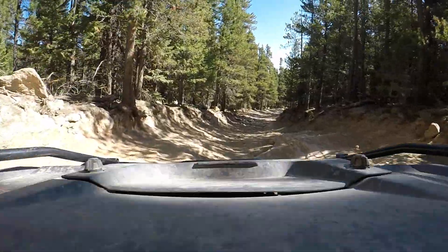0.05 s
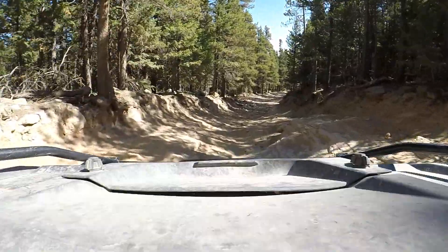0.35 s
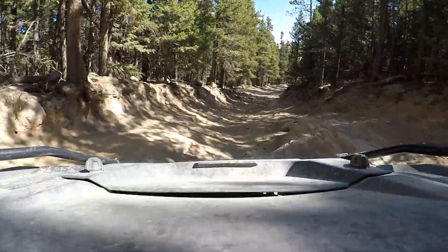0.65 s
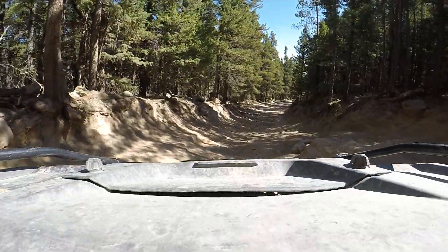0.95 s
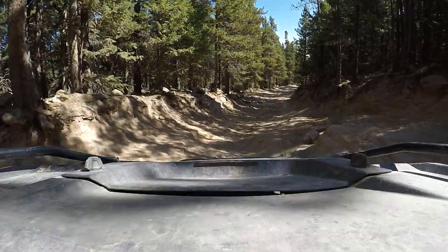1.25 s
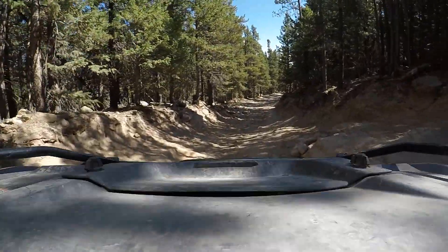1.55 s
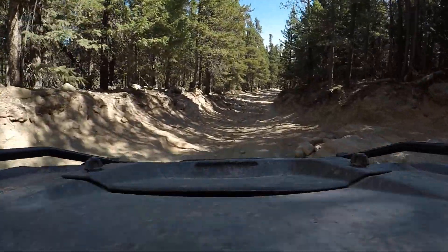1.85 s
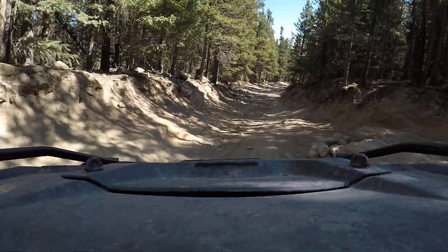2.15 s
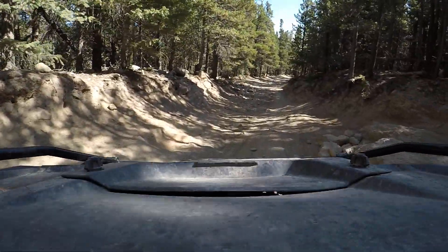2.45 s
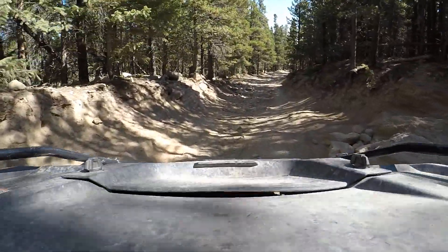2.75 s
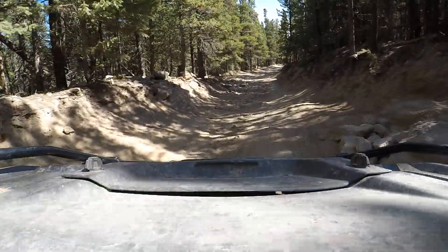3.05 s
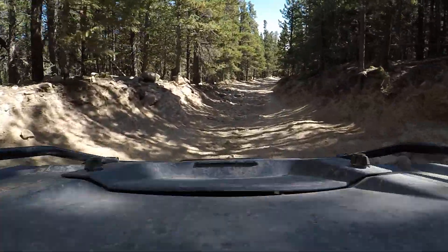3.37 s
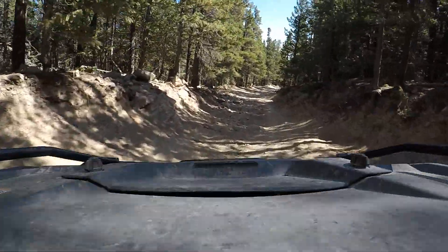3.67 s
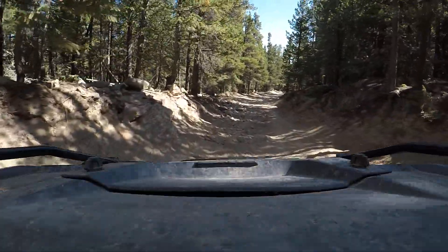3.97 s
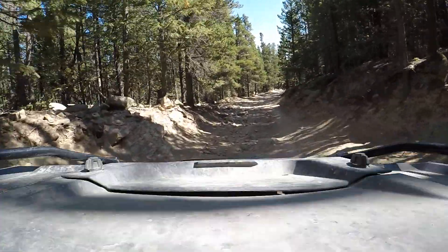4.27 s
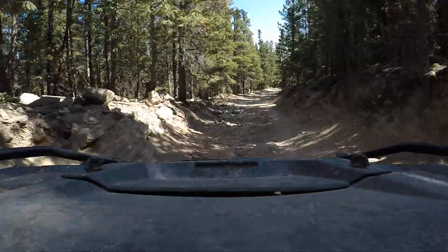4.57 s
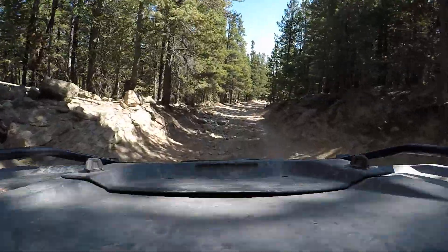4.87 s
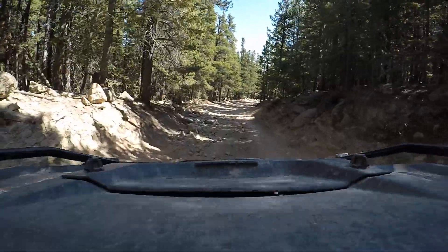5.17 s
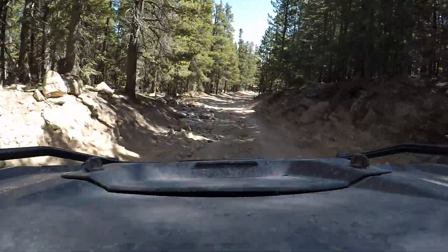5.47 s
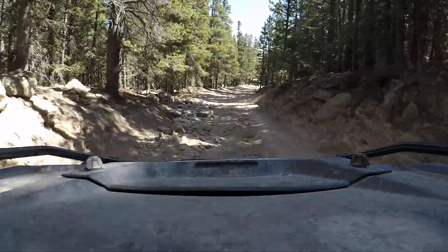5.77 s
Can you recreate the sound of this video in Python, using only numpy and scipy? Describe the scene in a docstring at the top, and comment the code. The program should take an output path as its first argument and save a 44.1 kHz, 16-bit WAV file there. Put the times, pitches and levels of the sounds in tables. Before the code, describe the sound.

A deep, throbbing engine eases off, chugs unevenly at low revs, then climbs again as an off-road vehicle works along a stony dirt track. Irregular jolts shake loose plastic and metal parts and send dull knocks through the underside. Short squeaks, faint creaks and a faint gear whine sit over the crunch of tyres. The microphone rides on the vehicle, close and dry.

```python
"""A booming twin-cylinder engine sinks almost to idle and pulls again as an off-road buggy crawls up a
rutted dirt trail, heard from its bonnet. Firings drive the exhaust and cab resonances; gas roars in the
engine bay. The chassis rumbles and creaks, tyres grind grit and gears whine. Jolts rattle loose fittings,
stones knock, metal clinks and dusty joints squeak. A limiter holds the boom down."""
import sys
import numpy as np
from scipy import signal
from scipy.fft import rfft, irfft, next_fast_len
from scipy.io import wavfile
from scipy.ndimage import uniform_filter1d, minimum_filter1d, map_coordinates

SR = 44100
rng = np.random.default_rng(int(sys.argv[2]) if len(sys.argv) > 2 else 0)


def generate_wav(signal):
    """Clip the signal to [-1, 1] and save it as 16-bit WAV at the path in sys.argv[1]."""
    frames = np.transpose(np.atleast_2d(signal))
    scaled = np.clip(frames, -1, 1) * 32767
    pcm = np.round(scaled).astype(np.int16)
    wavfile.write(sys.argv[1], SR, pcm)


N = 256662
TIME = np.arange(N) / SR

# Engine bay resonances. Each row: frequency in Hz, width in Hz, gain in dB.
BAY_MODES = [(221, 120, -6), (305, 84, 8), (402, 20, -18)]
# Resonances of loose fittings. Each row: frequency in Hz, width in Hz, gain in dB.
FITTING_MODES = [(553, 74, 3), (1210, 18, -8), (2303, 23, 1), (2993, 9.3, 3), (3140, 100, -5),
                 (3420, 17, -3), (3920, 70, -0.5), (4210, 110, -0.5), (4650, 510, -0.5), (4980, 61, -2),
                 (5730, 170, 1), (6160, 65, -2), (6530, 43, -8), (6760, 81, -7.5), (7000, 80, -19.5),
                 (8230, 63, -6.5), (9250, 100, -16)]
# Ground roughness. Each row: time in seconds, tyre grind in dB, grit and jiggle in dB.
ROUGHNESS = [(0, -31, -47.5), (.15, -37, -45.5), (.35, -37, -52.5), (.6, -36.5, -47), (.75, -33.5, -47.5),
             (1.0, -34.5, -46), (1.3, -41.5, -51), (1.5, -36, -45.5), (1.7, -36.5, -49.5),
             (1.95, -33.5, -44.5), (2.3, -36.5, -50), (2.72, -34.5, -50), (3.0, -29.5, -46),
             (3.25, -31, -44), (3.75, -32.5, -44), (4.15, -31, -45.5), (4.45, -35, -46.5), (4.8, -31, -46),
             (5.1, -34, -48), (5.82, -32.5, -44.5)]
# Rattling jolts. Each row: start in seconds, level in dB, middle against treble in dB, decay in seconds.
RATTLE_HITS = [(0.0014, -29, -13, 0.01), (0.096, -28.5, 3, 0.014), (0.177, -39, 9, 0.024),
               (0.226, -28, 9, 0.026), (0.3461, -39.5, 9.5, 0.0078), (0.7, -37, 3, 0.02),
               (0.7846, -37, 5, 0.004), (0.8978, -36, -5, 0.036), (0.947, -35.5, 1, 0.022),
               (1.006, -36.5, 8.5, 0.012), (1.062, -26.5, -19, 0.0075), (1.1448, -42.5, 11, 0.012),
               (1.1922, -42.5, 12, 0.0097), (1.4425, -31.5, -14, 0.024), (1.539, -32.5, -15, 0.014),
               (1.942, -23.5, -8, 0.03), (2.1833, -39, 3.5, 0.075), (2.3432, -24.5, 0.5, 0.027),
               (2.4812, -36.5, 5.5, 0.02), (3.046, -22, -20, 0.03), (3.212, -34, 5, 0.023),
               (3.248, -33, 4, 0.01), (3.278, -33, -5, 0.014), (3.4113, -33, -6.5, 0.082),
               (4.0039, -35.5, -2, 0.016), (4.4521, -26, -7, 0.0096), (4.645, -36, 1, 0.015),
               (4.9478, -35.5, 3, 0.018), (5.678, -33.5, -3, 0.028), (5.7523, -34.5, -12, 0.016)]
# Blows from stones and bump stops. Each row: start in seconds, level in dB, pitch in Hz.
KNOCK_HITS = [(0.034, -29, 2310), (0.109, -20.5, 1870), (0.137, -30, 1710), (.139, -25.5, 585),
              (.2, -27, 600), (.231, -29, 570), (0.238, -18.5, 326), (.246, -24, 2170), (.256, -29.5, 580),
              (.706, -30, 1430), (.742, -29.5, 614), (0.831, -26, 1300), (.893, -21.5, 408),
              (.905, -25.5, 1270), (.955, -28.5, 936), (1.009, -25, 1650), (1.667, -26, 704),
              (1.702, -21, 800), (1.777, -29, 623), (1.95, -24, 510), (2.102, -30, 980), (2.183, -27, 960),
              (3.11, -22.5, 905), (3.236, -19, 820), (3.252, -25, 1030), (3.861, -27, 750),
              (4.128, -29, 1340), (4.533, -26, 995), (4.653, -23.5, 447), (4.817, -23.5, 776),
              (4.86, -24.5, 1320)]


def engine_boom(cycle_hz, cycles, lumpy, level_db=1, overrun_db=-1.5, stumble_db=3, ring_cycles=1.45):
    """Engine orders swell as the revs carry them through the exhaust and cab boom near 100 Hz."""
    # Levels in dB of orders 1 to 10, multiples of the cycle rate.
    order_db = [3, -14.5, -19, 2, 0, -17.5, -11, -3.5, -8, -10.5]
    # Exhaust and cab response. Each row: frequency in Hz, gain in dB.
    response = [(12, -44), (28, -27.5), (38, -37.5), (55, -21.5), (72, -23.5), (86, -19), (96, -12.5),
                (112, -16.5), (135, -25.5), (160, -47), (300, -62)]
    boom_hz, boom_db = np.transpose(response)
    out = np.zeros(N)
    uneven = cycles + .03 * lumpy ** 2 * walk(12)  # a lumpy engine fires early or late
    for order, db in enumerate(order_db, 1):
        strays = order in (3, 6, 10)  # the rest keep step with the firings
        log_hz = np.log(order * cycle_hz)
        resonance_db = np.interp(log_hz, np.log(boom_hz), boom_db)
        waver_db = (3 if strays else 1) * walk(21)
        drift = strays * .28 * np.sqrt(lumpy) * walk(5.3)
        phase = order * uneven - ring_cycles * log_hz + drift  # lows linger longest
        out += undb(db + level_db + resonance_db + waver_db) * np.sin(2 * np.pi * phase)
    stumble = undb(lumpy * (overrun_db + stumble_db * walk(21)))
    return np.sqrt(2) * out * putter(cycles, lumpy) * stumble


def lumpiness(cycle_hz, overrun_hz_per_s=25, smooth_hz=34):
    """Uneven running, 0 to 1: greatest near idle and while the revs drop."""
    idling = np.clip((smooth_hz - cycle_hz) / (smooth_hz - cycle_hz.min()), 0, 1) ** 2
    overrun = np.maximum(-np.gradient(cycle_hz) * SR, 0) / overrun_hz_per_s
    return uniform_filter1d(np.minimum(idling + overrun, 1), size=SR // 3)


def putter(cycles, lumpy, lag_cycles=.3):
    """Gain that swells once a cycle; the lumpier the engine, the deeper the gaps."""
    depth = .58 * np.sqrt(lumpy)
    return (1 + depth * np.cos(2 * np.pi * (cycles - lag_cycles))) / np.sqrt(1 + depth ** 2 / 2)


def exhaust_bark(cycles, level_db=-3.5, scatter_db=.5, panel_db=-14, panel_decay_s=.023, lag_cycles=.05):
    """One strong firing a cycle, never quite on time, rings the pipe and the panels."""
    # Throttle. Each row: time in seconds, bark level in dB.
    throttle = [(0, -42), (1, -34), (3.3, -38), (3.62, -27.5), (4.05, -25.5), (4.25, -33), (5.82, -38.5)]
    # Exhaust pipe resonances. Each row: frequency in Hz, width in Hz, gain in dB.
    pipe_modes = [(234.3, 32, -2), (316, 20, -14), (416, 33, -9.5)]
    throttle_db, = curves(throttle)
    count = np.floor(cycles - lag_cycles + .0013 * walk(16))
    pulses = np.diff(count, prepend=count[0]) * undb(scatter_db * walk(27))
    t = TIME[:SR // 12]
    panel_ring = rng.standard_normal(len(t)) * np.exp(-t / panel_decay_s)
    panels = body(signal.fftconvolve(pulses, panel_ring)[:N], BAY_MODES)
    pipe = body(body(pulses, pipe_modes), BAY_MODES)
    thuds = unit(pipe) + undb(panel_db) * unit(panels)
    return undb(throttle_db + level_db) * unit(colour(thuds, [(150, -1.5), (500, -5), (1100, -7)]))


def bay_roar(cycles, level_db=-3, knock_db=-8, throb_depth=.11):
    """Intake and exhaust gas rush through the bay, swelling with firings and the deepest knocks."""
    # Engine load. Each row: time in seconds, roar level in dB.
    load = [(0, -31.5), (.85, -30), (1.2, -36.5), (2.1, -37.5), (2.4, -33), (2.75, -45), (3.0, -30.5),
            (3.28, -24), (3.7, -38.5), (4.05, -42), (4.4, -47), (4.68, -31.5), (5.15, -28), (5.82, -27)]
    load_db, = curves(load)
    deep_knocks = [(s, db) for s, db, hz in KNOCK_HITS if hz < 550]
    gain = undb(load_db + level_db) + undb(knock_db) * jolts(deep_knocks, rise_s=.0071, settle_s=.039)
    rush = colour(body(rng.standard_normal(N), BAY_MODES), [(160, 9), (450, -11.5), (900, -13)])
    return gain * unit(rush * (1 + throb_depth * np.cos(2 * np.pi * cycles)))


def chassis_rumble(throb, level_db=-3, bump_db=4):
    """The chassis shakes with each firing and after each jolt."""
    # Chassis shaking. Each row: time in seconds, level in dB.
    shake = [(0, -11), (.5, -15), (.8, -8.5), (1.35, -25), (1.95, -11), (2.7, -20), (3.3, -18.5),
             (3.7, -23), (4.0, -27), (4.18, -9.5), (4.4, -19.5), (4.9, -27.5), (5.25, -19.5), (5.6, -12.5),
             (5.82, -12.5)]
    # Rumble spectrum. Each row: frequency in Hz, gain in dB.
    spectrum = [(12, -10), (25, -7), (45, 11), (70, 6.5), (110, 5.5), (135, 0), (165, -21.5), (260, -28),
                (500, -37.5)]
    shake_db, = curves(shake)
    gain = undb(shake_db + level_db) + undb(bump_db) * jolts(RATTLE_HITS, rise_s=.055, settle_s=.13)
    return unit(colour(rng.standard_normal(N), spectrum)) * gain * throb


def rattles(level_db=-3, middle_db=-1, rise_s=.004, ringing=1.35, split_hz=3200, tail_db=-19, tail_s=.13):
    """Each jolt sets off a flurry of contacts between loose plastic and metal parts."""
    # Rattle spectrum. Each row: frequency in Hz, gain in dB.
    spectrum = [(200, 0.5), (550, 0.5), (1000, 1), (2500, -4), (4700, -11.5), (6500, -10), (8000, -14),
                (10000, -21.5), (11500, -32), (15000, -43)]
    out, t = np.zeros(N), TIME[:SR // 4]
    low, high = (signal.butter(2, split_hz, kind, fs=SR) for kind in ("low", "high"))
    tail = undb(tail_db) * np.exp(-t / tail_s)
    for s, db, balance_db, decay_s in RATTLE_HITS:
        flurry = np.minimum(t / rise_s, 1) * (np.exp(-np.maximum(t - 2 * rise_s, 0) / decay_s) + tail)
        metal = signal.lfilter(*high, flurry * grains(len(t), 7000, 2.8))
        plastic = signal.lfilter(*low, flurry * grains(len(t), 7000, 2.8))
        contacts = metal + undb(balance_db + middle_db) * plastic
        add(out, s - rise_s / 2, 2 * undb(db + level_db) * contacts)
    return colour(out + ringing * body(out, FITTING_MODES), spectrum)


def knocks(level_db=-3, decay_s=.0089, rise_s=.00246, damping=.3):
    """Stones and bump stops send dull, gritty blows through the wheels and underside."""
    out, t = np.zeros(N), TIME[:SR // 10]
    push = np.minimum(t / rise_s, 1) * np.exp(-np.maximum(t - 2 * rise_s, 0) / decay_s)
    for s, db, hz in KNOCK_HITS:
        thud = unit(ring(rng.standard_normal(len(t)), hz, hz * damping))
        add(out, s - rise_s / 2, undb(db + level_db) * push * thud)
    return colour(out, [(300, -9.5), (450, 2), (2500, -6.5), (6000, -27.5)])


def tyre_grind(level_db=-2, flicker_db=1.5):
    """Tyres grind over stones in a dense stream of tiny impacts."""
    # Grind spectrum. Each row: frequency in Hz, gain in dB.
    spectrum = [(150, -22.5), (300, -1), (410, 3.5), (490, 1.5), (600, 0), (700, -1.5), (850, -1),
                (1050, -6), (1600, -10.5), (2500, -25), (5000, -34)]
    grind_db, _ = curves(ROUGHNESS)
    grind = unit(colour(grains(N, 2500, 1.1), spectrum))
    return grind * undb(grind_db + level_db + flicker_db * walk(30))


def grit(jiggle_db=-7, flicker_db=1.6, pebble_db=-9, scrape_s=.019):
    """Sand and pebbles crunch under the tread; the shaking keeps loose fittings faintly ringing."""
    # Crunch spectrum. Each row: frequency in Hz, gain in dB.
    spectrum = [(900, -9.5), (1800, 7), (2400, 5.5), (3200, 3), (4600, -1), (5300, -4.5), (6600, -1.5),
                (7600, -8.5), (9800, -16), (11200, -24.5), (13500, -44.5), (15000, -54)]
    _, grit_db = curves(ROUGHNESS)
    sand = unit(colour(grains(N, 7000, .85), spectrum)) * undb(flicker_db * walk(35))
    scrape = np.exp(-TIME[:SR // 30] / scrape_s)  # one pebble breaking loose
    scrapes = signal.fftconvolve(np.abs(grains(N, 45, 3)), scrape)[:N]
    pebbles = unit(colour(scrapes * rng.standard_normal(N), spectrum))
    # Fittings shift in their seats, so level and pitch wander.
    jiggle = unit(sum(undb(db + 2.5 * walk(12)) * wavering(hz, .008, 12, width_hz / 2)
                      for hz, width_hz, db in FITTING_MODES))
    return undb(grit_db) * (sand + undb(pebble_db) * pebbles + undb(jiggle_db) * jiggle)


def squeaks(level_db=-1, flutter_db=2.5, overtone_ratio=1.6, overtone_db=-24, scratch_width_hz=500):
    """Dusty joints and brake discs rub and sing briefly with a rough, sliding pitch."""
    # Each row: start in seconds, length in seconds, pitch in Hz, glide as a share of pitch, level in dB.
    rubs = [(1.072, 0.064, 2200, 0.069, -41), (1.077, 0.087, 1266, -0.12, -38),
            (1.583, 0.08, 1240, 0.12, -48), (1.683, 0.082, 1360, -0.024, -40),
            (1.803, 0.048, 1030, 0.064, -31), (1.821, 0.059, 2260, 0.02, -44),
            (1.922, 0.045, 4600, -0.039, -34), (1.978, 0.033, 5670, -0.011, -50),
            (2.45, 0.081, 1200, -0.18, -34), (2.862, 0.091, 8400, 0.029, -54),
            (2.903, 0.26, 9270, -0.012, -50), (3.136, 0.031, 1363, 0.022, -35),
            (3.282, 0.046, 5030, 0.005, -39), (3.451, 0.1, 3270, -.005, -41),
            (3.587, 0.11, 3150, 0.014, -40), (3.871, 0.12, 5040, -0.027, -41.5),
            (4.14, 0.19, 847, 0.046, -37), (4.19, 0.16, 9100, -0.053, -55),
            (4.222, 0.05, 5840, -0.0043, -43), (4.273, 0.13, 1315, -0.031, -38.5),
            (4.294, 0.05, 4900, -0.014, -46), (4.288, 0.1, 9750, -.02, -58), (4.487, .07, 4420, 0, -49)]
    waver = .003 * walk(120) + .009 * rng.standard_normal(N // 30 + 1).repeat(30)[:N]
    out, grip, dust = np.zeros(N), walk(170), rng.standard_normal(N)
    for s, length_s, hz, glide, db in rubs:
        span = slice(int(s * SR), int((s + length_s) * SR))
        slide = glide * np.linspace(-.5, .5, len(waver[span]))
        phase = 2 * np.pi * np.cumsum(hz * (1 + slide + waver[span])) / SR
        tone = np.sin(phase) + undb(overtone_db) * np.sin(overtone_ratio * phase)
        scratch = .38 * unit(ring(ring(dust[span], hz, scratch_width_hz), hz, scratch_width_hz))
        envelope = undb(db + level_db + flutter_db * grip[span]) * signal.windows.tukey(len(phase), .8)
        add(out, s, envelope * (tone + scratch))
    return out


def clinks(width_hz=330):
    """Metal chatters on metal and rings for an instant."""
    # Each row: start in seconds, pitch in Hz, level in dB, decay in seconds.
    contacts = [(1.062, 4280, -27, 0.0068), (1.064, 4880, -29, 0.0043), (2.345, 4670, -33, .012),
                (3.05, 6100, -26.5, 0.0073), (3.221, 10100, -58, 0.11), (3.41, 9900, -61, 0.034),
                (3.84, 10100, -64, .06), (4.25, 9900, -59, .06), (4.454, 4870, -39, 0.0091),
                (4.77, 10160, -60, 0.054), (5.25, 4400, -42, 0.014)]
    out, t = np.zeros(N), TIME[:SR // 4]
    for s, hz, db, decay_s in contacts:
        chatter = unit(ring(ring(rng.standard_normal(len(t)), hz, width_hz), hz, 3 * width_hz))
        add(out, s, undb(db) * np.exp(-t / decay_s) * chatter)
    return out


def chassis_creak(level_db=-3, steady_db=-52, flutter_db=.5):
    """The chassis groans faintly throughout and creaks with each twist."""
    # Each row: start in seconds, length in seconds, level in dB.
    twists = [(0.858, 0.14, -45), (1.463, 0.36, -41), (1.837, 0.44, -43.5), (2.244, 0.36, -42),
              (2.8, 0.47, -38.5), (3.173, 0.44, -37.5), (3.83, 0.35, -39), (4.225, .45, -62),
              (5.638, 0.15, -37.5)]
    strain = np.full(N, undb(steady_db))
    for s, length_s, db in twists:
        add(strain, s, undb(db + level_db) * signal.windows.tukey(int(length_s * SR), .6))
    groan = unit(wavering(1240, .05, 25, 33) + wavering(1370, .04, 25, 31))
    return groan * strain * undb(flutter_db * walk(25))


def gear_whine(cycle_hz, pitch_hz=405, level_db=-41.5):
    """The gears hold a rough tone, plainest at low revs."""
    return wavering(pitch_hz, .01686, 12, 9.5) * undb(level_db) * np.minimum(14 / cycle_hz, 1)


def jolts(events, rise_s, settle_s):
    """Shake envelope: each blow lifts it by its own strength, then it settles."""
    out, t = np.zeros(N), TIME[:SR // 2]
    shape = np.minimum(t / rise_s, 1) * np.exp(-np.maximum(t - rise_s, 0) / settle_s)
    for s, db, *_ in events:
        add(out, s - rise_s, undb(db) * shape)
    return out


def wavering(hz, wander, rate_hz, width_hz):
    """Rough tone whose pitch strays by about the share `wander`."""
    grip = signal.sosfilt(signal.butter(2, width_hz, fs=SR, output="sos"), rng.standard_normal(N))
    return unit(grip * np.sin(2 * np.pi * np.cumsum(hz * (1 + wander * walk(rate_hz))) / SR))


def grains(size, per_s, spread_db):
    """Random tiny impacts, most small and a few large."""
    chance, strength, sign = rng.random(size), rng.exponential(size=size), rng.standard_normal(size)
    return unit((chance < per_s / SR) * np.sign(sign) * undb(spread_db * np.minimum(strength, 5)))


def walk(rate_hz):
    """Random drift with a spread near 1."""
    points = rng.standard_normal(2048)
    return np.sqrt(3 / 2) * map_coordinates(points, [TIME * rate_hz], order=1, mode="wrap")


def colour(x, spectrum):
    """Filter by (Hz, dB) points, rolling off beyond both ends."""
    hz, db = np.transpose(spectrum)
    size = next_fast_len(len(x))
    f = np.maximum(np.arange(size // 2 + 1) * SR / size, 1)
    gain = undb(np.interp(np.log(f), np.log(hz), db))
    rolloff = np.minimum(f / hz[0], 1) ** 2 * np.minimum(hz[-1] / f, 1) ** 2
    return irfft(rfft(x, size) * gain * rolloff, size)[:len(x)]


def ring(x, hz, width_hz):
    """One resonance, gain 1 at its centre."""
    return signal.lfilter(*signal.iirpeak(hz, hz / width_hz, fs=SR), x)


def body(x, modes):
    """Resonances driven in parallel."""
    return sum(undb(db) * ring(x, hz, width_hz) for hz, width_hz, db in modes)


def curves(table):
    """Interpolate each value column over the times in the first."""
    s, *columns = np.transpose(table)
    return [np.interp(TIME, s, column) for column in columns]


def add(out, s, x):
    """Mix x in at s seconds."""
    start = max(int(s * SR), 0)
    out[start:start + len(x)] += x[:len(out) - start]


def undb(db):
    """Decibels to gain."""
    return 10 ** (np.asarray(db) / 20)


def unit(x):
    """Scale to rms 1."""
    return x / np.sqrt(np.mean(x ** 2) + 1e-18)


def scene(firing_s=3.815):
    """Every source rides on the vehicle: close, mono, no echo."""
    # Engine speed. Each row: time in seconds, four-stroke cycle rate in Hz.
    speed = [(0, 28.6), (.17, 27.7), (.3, 24.8), (.43, 22.2), (.7, 22.3), (.82, 20.3), (.95, 18.2),
             (1.15, 18.3), (1.3, 16.7), (1.47, 13.9), (1.75, 13.9), (2.15, 12.9), (2.4, 12.2), (2.7, 11.7),
             (3.0, 12.0), (3.2, 13.7), (3.4, 16.1), (3.62, 18.7), (3.8, 19.5), (4.05, 18.6), (4.22, 20.0),
             (4.4, 20.6), (4.55, 22.3), (4.7, 26.6), (4.82, 29.1), (5.03, 27.4), (5.47, 26.0), (5.65, 28.1),
             (5.82, 31.2)]
    cycle_hz, = curves(speed)
    cycles = np.cumsum(cycle_hz) / SR
    cycles -= np.interp(firing_s, TIME, cycles)  # one firing sets the beat
    lumpy = lumpiness(cycle_hz)
    engine = engine_boom(cycle_hz, cycles, lumpy) + exhaust_bark(cycles) + bay_roar(cycles)
    running_gear = chassis_rumble(putter(cycles, lumpy)) + tyre_grind() + gear_whine(cycle_hz)
    mix = engine + running_gear + chassis_creak() + grit() + rattles() + clinks() + knocks() + squeaks()
    return mix[None]


def record(dry, ceiling=.55, drive_db=4.5, bass_hz=200, top_hz=15600, fade_s=.004):
    """A limiter boosts the bass and turns it down around each peak; the top is cut."""
    bass = signal.sosfiltfilt(signal.butter(4, bass_hz, fs=SR, output="sos"), dry)
    driven = bass * undb(drive_db)
    allowed = ceiling / np.maximum(np.abs(driven), ceiling)
    held = minimum_filter1d(allowed, size=700)
    gain = uniform_filter1d(uniform_filter1d(held, size=400), size=300)
    fade_in = np.minimum(TIME / fade_s, 1)
    top_cut = signal.ellip(8, .2, 70, top_hz, fs=SR, output="sos")
    return signal.sosfilt(top_cut, fade_in * (dry - bass + gain * driven))


dry = scene()
out = record(dry)
generate_wav(out)
```